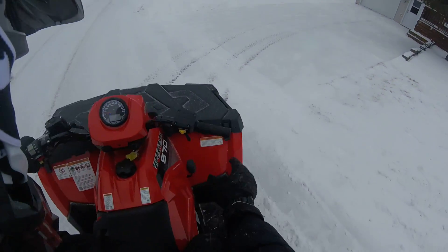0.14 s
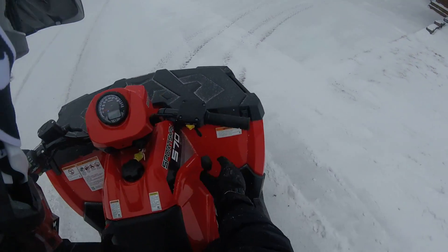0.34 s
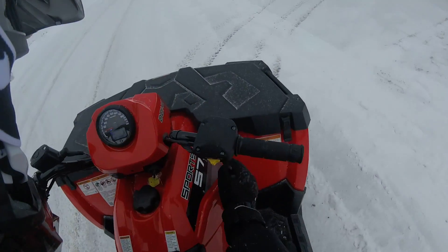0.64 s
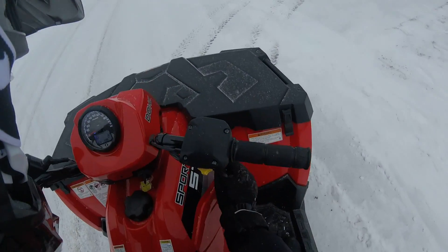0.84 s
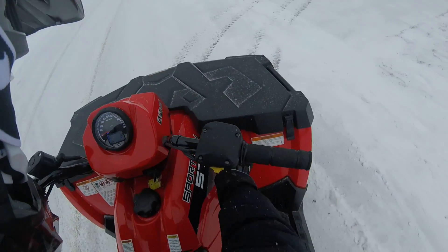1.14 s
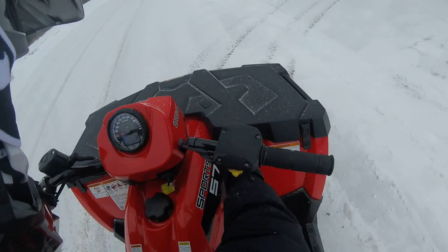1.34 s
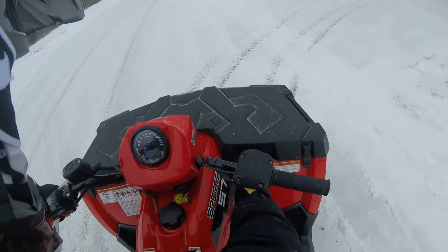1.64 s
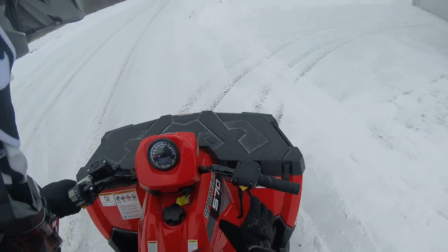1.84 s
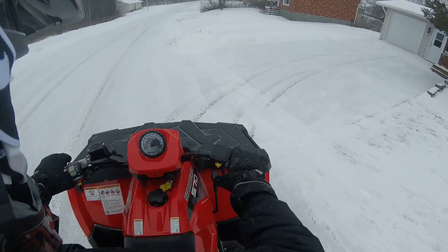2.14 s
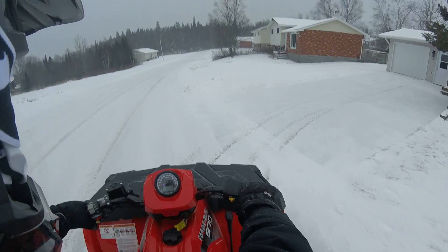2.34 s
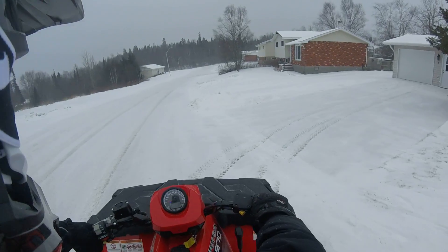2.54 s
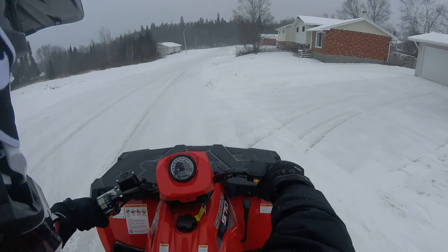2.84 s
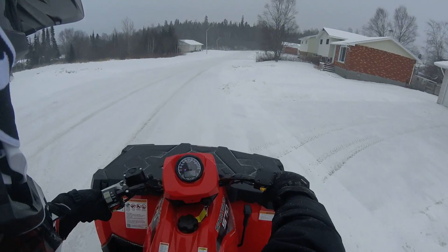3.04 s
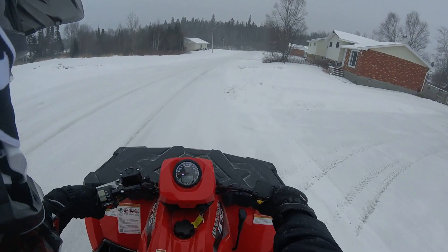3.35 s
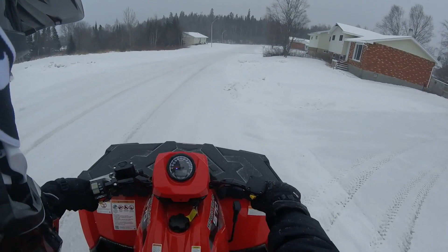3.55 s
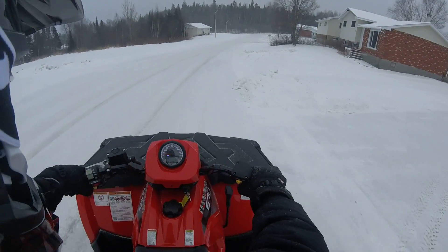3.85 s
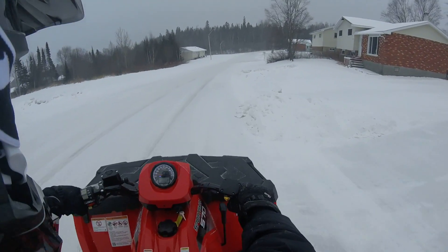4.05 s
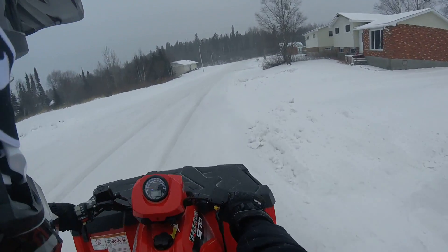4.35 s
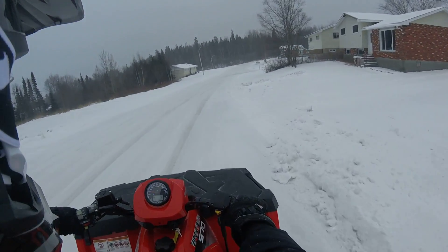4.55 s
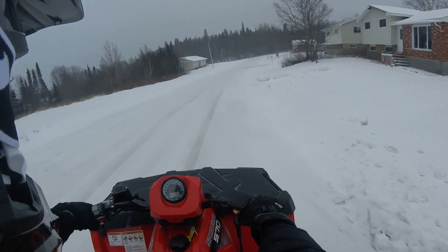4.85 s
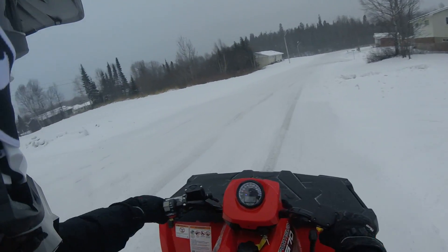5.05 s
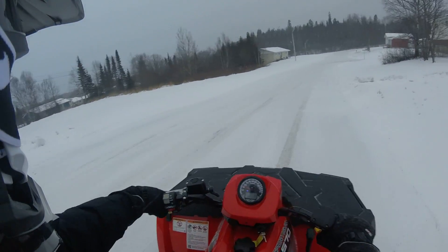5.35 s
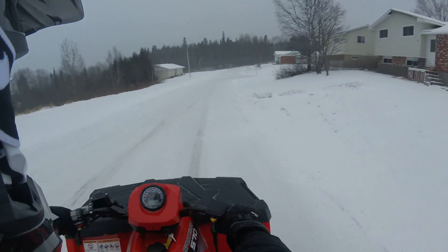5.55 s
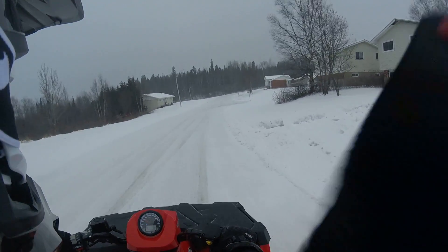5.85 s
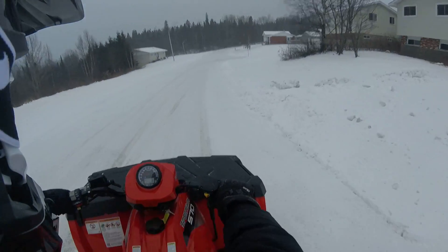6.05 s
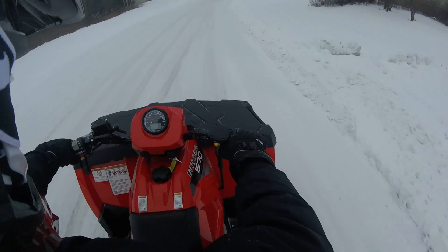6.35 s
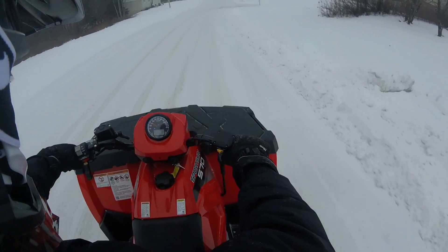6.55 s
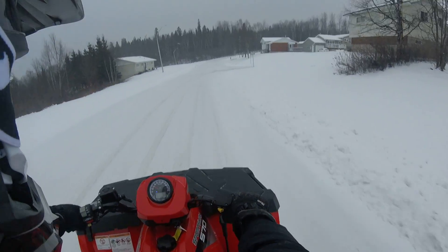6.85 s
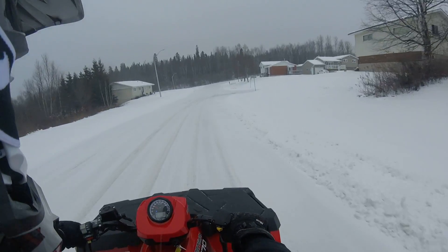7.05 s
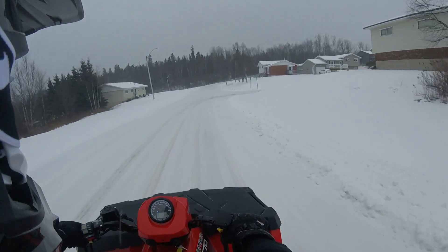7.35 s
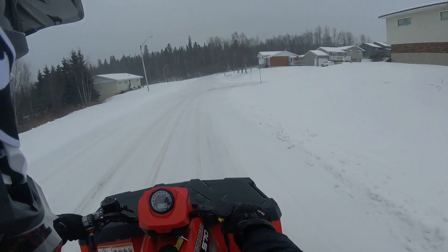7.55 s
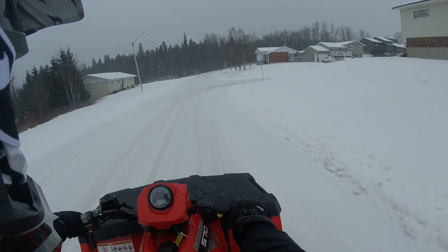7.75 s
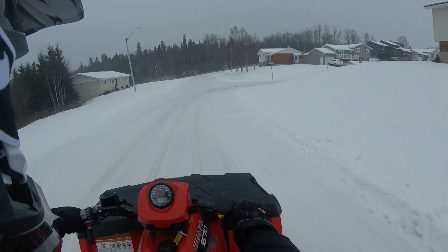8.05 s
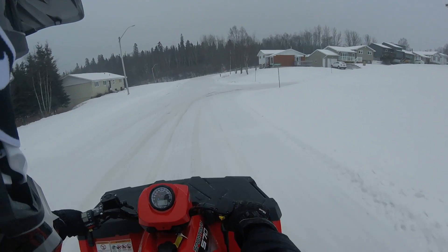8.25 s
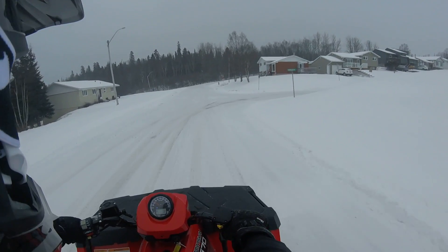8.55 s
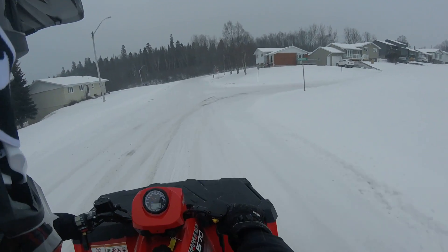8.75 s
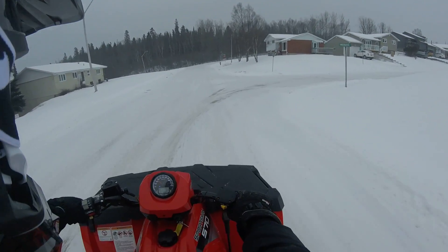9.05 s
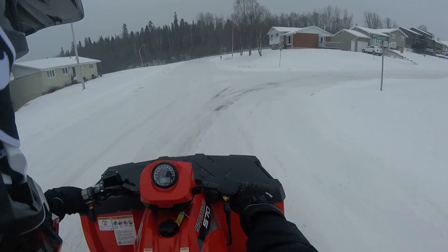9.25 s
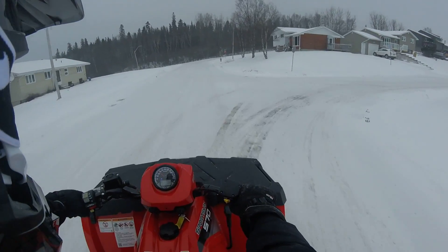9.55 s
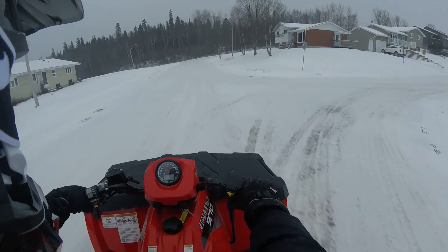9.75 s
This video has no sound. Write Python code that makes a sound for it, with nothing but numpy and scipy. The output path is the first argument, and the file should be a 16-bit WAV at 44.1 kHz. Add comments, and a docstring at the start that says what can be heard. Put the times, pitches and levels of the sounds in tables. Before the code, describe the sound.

A four-wheeler's single-cylinder engine putters at idle, clunks into gear, then revs up and drones along as wind buffets the microphone.

```python
"""A single-cylinder four-wheeler idles on a snowy road, clunks into gear and pulls away.
Idle firings thump in the muffler over a clatter of valve gear; under load they merge into a harmonic
drone with a roar that throbs each cycle, and the gears whine. It is heard from the rider's helmet,
through a microphone in a small housing that rings near 6 kHz; head wind buffets it as speed grows."""
import sys
import numpy as np
from scipy import signal
from scipy.fft import rfft, irfft, next_fast_len
from scipy.io import wavfile

SR = 44100
rng = np.random.default_rng(int(sys.argv[2]) if len(sys.argv) > 2 else 0)


def transcribe(signal):
    """Save signal, clipped to [-1, 1], as a 16-bit WAV file at the path in sys.argv[1]."""
    frames = np.atleast_2d(signal).T
    limited = np.clip(frames, -1, 1)
    pcm = np.round(limited * 32767).astype(np.int16)
    wavfile.write(sys.argv[1], SR, pcm)


N = 436590
TIME_S = np.arange(N) / SR

# idle firings where the pace changes: start_s, level_db
IDLE_BEATS = [(-0.004, -8), (0.063, -4.5), (0.449, -5), (1.15, -3.5), (1.342, -5.5), (1.448, -7.5),
              (1.938, -6.5), (2.521, -5.5), (2.59, -3)]
IDLE_PERIOD_S = 0.098

def idle_firings():
    """Times and levels of all idle firings: even beats fill the gaps between the listed ones."""
    start_s, level_db = np.transpose(IDLE_BEATS)
    count = np.r_[0, np.cumsum(np.round(np.diff(start_s) / IDLE_PERIOD_S))]
    firing_s = np.interp(np.arange(count[-1] + 1), count, start_s)
    return firing_s, np.interp(firing_s, start_s, level_db)


# low thump of the muffler: pitch_hz, level_db, t60_s
MUFFLER_MODES = [(86, 3, 0.053), (111.8, 1, 0.18), (56.5, -24, 0.058)]
# hollow ring of the tailpipe: pitch_hz, level_db, t60_s
TAILPIPE_MODES = [(213, -26.5, 0.085), (263, -22, 0.059), (335, -31, 0.049), (440, -31, .04),
                  (540, -32, .03)]
PUFF_LEAD_S, SURGE_GAP_S = 0.0047, 0.0115

def idle_putts():
    """A puff of gas, first a dip in pressure, rings the muffler; three surges ring the tailpipe."""
    start_s, level_db = idle_firings()
    thump = struck(start_s - PUFF_LEAD_S, level_db, MUFFLER_MODES, spread_db=1)
    surges = sum(struck(start_s + k * SURGE_GAP_S, level_db, TAILPIPE_MODES, spread_db=4)
                 for k in range(3))
    return soften(surges, puff_ms=4.08) - soften(thump, puff_ms=9.44)


# engine revs under load: time_s, firing_hz
REVS = [(2.63, 23.5), (2.69, 26.2), (2.73, 27.4), (2.81, 29.3), (2.85, 29.9), (3.01, 31.6), (3.12, 33.2),
        (3.32, 38.5), (3.4, 40.7), (3.54, 44.2), (3.68, 45.9), (3.76, 45.6), (4.07, 43.2), (4.63, 42.8),
        (4.8, 42.4), (5.02, 42.5), (5.26, 42.9), (5.87, 43.1), (6.03, 43.7), (7.79, 44.5), (9.11, 44.5),
        (9.17, 45.2), (9.33, 48.6), (9.43, 50.3), (9.59, 51.3), (9.7, 51.7), (9.9, 48.5)]
# faders of the pulling engine: time_s, drone_db, roar_db
LOAD_LEVELS = [(2.6, -24.5, -35), (2.72, -18.5, -28), (2.97, -16.5, -24), (3.29, -18, -25.5),
               (3.45, -15.5, -24.5), (3.8, -17.5, -23.5), (4.17, -15, -25), (4.8, -15.5, -25.5),
               (5.33, -17.5, -23), (5.85, -15.5, -26), (7.3, -22, -31), (8.2, -20, -26.5),
               (8.5, -17.5, -27), (8.93, -29, -26.5), (9.03, -22.5, -26), (9.58, -18.5, -21.5),
               (9.9, -30, -24)]

def engine_under_load():
    """Fast firings make a drone; rushing gas roars and sets panels singing; the gears whine along."""
    firing_hz, = automation(REVS)
    drone_db, roar_db = automation(LOAD_LEVELS)
    running = gate(REVS[0][0], fade_s=0.035)
    cycles = np.cumsum(firing_hz * (running == 1)) / SR
    gas = rng.standard_normal(N) * from_db(0.72 * drift(9.5))
    roar_mix = gas_roar(gas, cycles) + singing_panels(gas) + gear_whine(cycles)
    drone = exhaust_drone(firing_hz, cycles)
    return running * (from_db(drone_db) * drone + from_db(roar_db) * roar_mix)


# tone of the exhaust: pitch_hz, gain_db
EXHAUST_EQ = [(20, -2), (43, 3.5), (87, 2), (130, 2.5), (148, -0.5), (170, -1), (215, -13.5), (243, -1),
              (262, -4), (278, -7.5), (300, -6.5), (345, -17.5), (388, -11), (430, -7.5), (472, -14.5),
              (515, -8.5), (560, -4.5), (600, -14), (645, -21), (690, -19), (735, -16), (775, -40),
              (840, -26), (920, -29.5), (1100, -29), (1200, -26.5), (1400, -54)]
# the pipes smear each firing, each harmonic trailing the one below: pitch_hz, lag_cycles
PIPE_LAG = [(28, .7), (43, .9), (55, .55), (100, .5), (135, .7), (150, .7), (180, .45), (205, 1.05),
            (260, 1.2), (440, 1.25), (510, 1.72), (900, 1.74), (1100, 1.9)]
# crank and balancer shake: harmonic, boost_db
CRANK_SHAKE = [(1, 3.5), (2, 2), (3, 1.5), (4, 10.5), (5, 3), (6, 3.5), (7, 1.5), (8, -2)]
# the frame's answer to the fourth harmonic: pitch_hz, gain_db
FRAME_SHAKE = [(94, 0), (110, -2.5), (133, -2.5), (148, -6), (163, -2), (175, -4), (184, 2.5), (205, 3)]
FRAME_LAG_CYCLES = 0.2  # the frame is a shorter path than the pipes
BARK_S, BARK_DECAY_S, REOPENED_S = 2.82, 0.32, (9.2, 9.55)

def exhaust_drone(firing_hz, cycles):
    """Harmonics of the firing rate, shaped by the pipes; the opening throttle barks and growls."""
    step = 8  # built at an eighth of the sample rate
    bark = settle(BARK_S, BARK_DECAY_S) * gate(BARK_S, fade_s=0.29)
    intake_db = (5.5 * bark - 0.1)[::step]
    growl_db = 5 * np.maximum(0.5 * bark, gate(*REOPENED_S, fade_s=0.12))[::step]
    firing_hz, cycles = firing_hz[::step], cycles[::step]
    eq_hz, eq_db = np.transpose(EXHAUST_EQ)
    drone, lag = 0, 0
    for k in range(1, 46):
        hz = k * firing_hz
        lag += FRAME_LAG_CYCLES if k == 4 else lookup(hz, PIPE_LAG)
        level_db = np.interp(np.log(hz), np.log(eq_hz), eq_db, right=-80)
        level_db += lookup(k, CRANK_SHAKE, right=0)
        if k % 4 == 0:  # higher multiples of the fourth stand out too
            level_db += lookup(hz, FRAME_SHAKE) if k == 4 else 4.5
        level_db += intake_db * ((hz > 400) + 1.54 * (hz > 950))  # the upper intake ring barks harder
        level_db += growl_db * (hz > 225) * (hz < 335)
        level_db += 1.2 * drift(6, step)
        level_db += 1.2 * drift(25, step) * (hz > 400)  # upper harmonics are more ragged
        wobble = (0.07 + 0.012 * k) * drift(7, step)
        drone += from_db(level_db) * np.sin(2 * np.pi * (k * cycles - lag) + wobble)
    return unit_rms(signal.resample_poly(drone, step, 1, padtype="antireflect")[:N])


# tone of the rushing gas: frequency_hz, gain_db
ROAR_EQ = [(25, -22), (60, -6.5), (105, -4.5), (150, -10), (240, -8), (350, -13.5), (550, -16.5),
           (800, -22), (1200, -25.5), (1700, -25), (2800, -28.5), (4500, -35.5), (7000, -39), (12000, -40)]
THROB_LAG_CYCLES, RASP_ABOVE_HZ = 0.898, 2270

def gas_roar(gas, cycles):
    """Gas noise bursts into a bright rasp once a cycle; hard early beats melt into the roar."""
    throb = (0.5 + 0.5 * np.cos(2 * np.pi * (cycles - THROB_LAG_CYCLES))) ** 4.5
    burst_db = 2.5 + 7.5 * settle(2.99, decay_s=0.22)
    rasp = highpass(gas * (from_db(burst_db * throb) - 1), RASP_ABOVE_HZ)
    return unit_rms(colour(gas + rasp, ROAR_EQ))


# resonances of the panels: pitch_hz, width_hz, level_db
PANEL_MODES = [(2510, 90, -33), (2763, 37, -33.5), (3040, 110, -35)]

def singing_panels(gas):
    """Gas noise excites narrow resonances, loudest at the top of the first rev."""
    singing = 0
    for hz, width_hz, db in PANEL_MODES:
        ring = signal.lfilter(*signal.iirpeak(hz, hz / width_hz, SR), gas)
        singing += from_db(db) * unit_rms(ring)
    return singing * from_db(10.5 * gate(3.53, 3.95, fade_s=0.35))


# gear and valve tones: firing_multiple, level_db
WHINE_PARTIALS = [(25, .5), (38, 1), (46.5, -3)]

def gear_whine(cycles):
    """Gears and valves sing wavering tones that follow the revs, fainter later in the ride."""
    whine = 0
    for multiple, db in WHINE_PARTIALS:
        level = from_db(db + 3 * drift(14))
        whine += level * np.sin(2 * np.pi * multiple * cycles + 1.1 * drift(13))
    return whine * from_db(-19.5 - 6 * gate(6.6, fade_s=0.66))


# tone of the valve gear and belt: frequency_hz, gain_db
CLATTER_EQ = [(25, -42), (60, -2), (110, 1), (170, -7.5), (300, -10.5), (500, -16), (800, -21.5),
              (1080, -21.5), (1400, -25), (2000, -28), (4000, -34.5), (8000, -38.5), (12000, -32)]
QUIETER_S, THROTTLE_S, IDLE_WHINE_HZ = 1.41, 2.567, 726
SWELL_DB, SWELL_WIDTH_S, SWELL_LAG_S = 2.5, 0.025, 0.01

def idle_clatter():
    """Valve gear and belt rustle, swelling with each firing; a thin whine comes and goes."""
    firing_s, _ = idle_firings()
    stroke = np.interp(TIME_S - SWELL_LAG_S, firing_s, np.arange(len(firing_s)))
    off_beat_s = (stroke - np.round(stroke)) * IDLE_PERIOD_S
    swell = np.exp(-(off_beat_s / SWELL_WIDTH_S) ** 2) * (TIME_S < firing_s[-1])
    # quieter from 1.4 s on, louder as the throttle opens
    level_db = -37.5 - 3 * gate(QUIETER_S, fade_s=0.12) + 9 * gate(THROTTLE_S, fade_s=0.088)
    rustle = rng.standard_normal(N) * from_db(1.2 * drift(20))
    clatter = unit_rms(colour(rustle, CLATTER_EQ)) * from_db(level_db + SWELL_DB * swell)
    whine_db = -51.5 - 25 * np.abs(TIME_S - np.clip(TIME_S, 0.55, 1.75))  # fades in, holds, fades out
    whine = from_db(whine_db) * np.sin(phase(IDLE_WHINE_HZ + 0.8 * drift(3.3)))
    return (clatter + whine) * gate(0, 2.525, fade_s=0.22)


def drivetrain_whine():
    """A thin, wavering tone from the drivetrain climbs as the ride gathers speed, then levels off."""
    pitch_hz = np.minimum(607 + 67 * (TIME_S - 6.3), 725)
    level = from_db(-36.5 + drift(3)) * gate(6.7, 8.0, fade_s=0.57)
    return level * np.sin(phase(pitch_hz) + 0.24 * drift(18))


# gear lever and glove hits: start_s, level_db, thud_offset_db
KNOCK_HITS = [(0.03, -35, 9), (0.101, -27, 3), (0.17, -42, 12), (0.26, -46, 12), (0.604, -27, 2),
              (1.009, -21.5, -4), (1.015, -19.5, 7.5), (1.03, -8.5, -6.5), (1.132, -25.5, 7.5),
              (1.338, -27, -4), (1.376, -11.5, -15), (1.384, -4.5, -6.5), (1.409, -26, 5),
              (2.081, -25.5, -4), (2.608, -17.5, -1.5)]
# tone of the crunch: frequency_hz, gain_db
CRUNCH_EQ = [(100, -40), (300, -2), (435, -4.5), (500, -0.5), (560, 1), (640, -21), (725, 0), (860, -11.5),
             (1030, -11.5), (1500, -18.5), (3000, -18), (6000, -25.5), (12000, -36)]
# tone of the thud: frequency_hz, gain_db
THUD_EQ = [(60, -20), (150, -1), (300, -2), (550, -9), (1000, -18.5), (3000, -42)]

def lever_and_glove_knocks():
    """Each knock is a short crunch of uneven clicks over a low thud that lasts longer."""
    crunch, thud = np.zeros(N), np.zeros(N)
    for start_s, db, thud_offset_db in KNOCK_HITS:
        crunch += hit_envelope(start_s, db, rise_s=0.0059, t60_s=0.042)
        thud += hit_envelope(start_s, db + thud_offset_db, rise_s=0.01, t60_s=0.13)
    clicks = rng.standard_normal(N) * from_db(0.91 * drift(280))
    return crunch * unit_rms(colour(clicks, CRUNCH_EQ)) + thud * unit_rms(colour(clicks, THUD_EQ))


# fader of the head wind: time_s, level_db
WIND_LEVELS = [(3.0, -52), (5.9, -25.5), (6.3, -25.5), (6.8, -29.5), (7.0, -23.5), (7.12, -19.5),
               (7.35, -22.5), (7.5, -25), (7.72, -21), (7.95, -21.5), (8.12, -20), (8.22, -16.5),
               (8.33, -19.5), (8.45, -16.5), (8.6, -19), (8.8, -17), (8.97, -20), (9.1, -20.5), (9.28, -18),
               (9.55, -17.5), (9.9, -19)]
# single slaps of wind: start_s, level_db
WIND_SLAPS = [(7.117, -20), (7.699, -7), (8.319, -2), (8.419, -11), (8.499, -13), (8.611, 2), (8.719, -11),
              (9.029, -5), (9.759, -11.5)]
# low rumble of the buffeting: frequency_hz, gain_db
BUFFET_EQ = [(20, 6.5), (50, 5.5), (150, 1), (350, -3), (700, -9), (1400, -27), (3000, -51)]
# hiss on top of the gusts: frequency_hz, gain_db
GUST_EQ = [(200, -26.5), (500, -5.5), (900, -5.5), (1500, -19), (3000, -47.5)]
SLAP_TRIM_DB, FULL_GUST_DB = -9.5, -13.5

def head_wind():
    """Air buffets the microphone with lumpy low noise and single slaps; strong gusts are brighter."""
    lumps = rng.standard_normal(N) * from_db(0.6 * drift(8) + 2.5 * drift(35))
    level_db, = automation(WIND_LEVELS)
    level = from_db(level_db) * gate(WIND_LEVELS[0][0], fade_s=0.27)
    for start_s, db in WIND_SLAPS:
        level += hit_envelope(start_s, db + SLAP_TRIM_DB, rise_s=0.006, t60_s=0.054)
    rumble = unit_rms(colour(lumps, BUFFET_EQ))
    hiss = unit_rms(colour(lumps, GUST_EQ)) * from_db(-12.5 + 0.77 * (level_db - FULL_GUST_DB))
    return level * (rumble + hiss)


# ticks on the housing: start_s, level_db, body_offset_db, ring_offset_db
TICK_HITS = [(0.105, -32, -5, -16), (0.53, -43, 5, -12), (0.785, -43, -8, -12), (1.3497, -39, -4, -12),
             (2.0825, -42, -4, -4), (2.2167, -40, -3, -10), (2.55, -36, -3, -12), (5.9274, -48, 0, -12),
             (5.9459, -29, -5, -12), (5.9588, -13, -3.5, 0), (6.487, -39, 8, -15.5),
             (6.5252, -15, -3.5, -13), (7.683, -36, -4, -12), (8.151, -25, -2, -12)]
# bright snap of the shell: pitch_hz, level_db, t60_s
SNAP_MODES = [(6460, -0.5, 0.0037), (8160, -5, 0.0024), (11000, 5, 0.0013), (13500, -6, 0.0015)]
# its lower body: pitch_hz, level_db, t60_s
BODY_MODES = [(850, 0.5, 0.0068), (1300, 1.5, 0.0051), (2240, 5.5, 0.004), (3960, 4, 0.0043)]
# its longer ring: pitch_hz, level_db, t60_s
RING_MODES = [(1340, -15.5, 0.067)]

def housing_ticks():
    """Small hits ring the shell of the microphone housing."""
    start_s, level_db, body_offset_db, ring_offset_db = np.transpose(TICK_HITS)
    snap = struck(start_s, level_db, SNAP_MODES, spread_db=1.5)
    body = struck(start_s, level_db + body_offset_db, BODY_MODES, spread_db=1.5)
    ring = struck(start_s, level_db + ring_offset_db, RING_MODES, spread_db=1)
    return snap + body - ring


# dips in the riding sound: start_s, depth_db, recovery_s
LEVEL_DIPS = [(5.92, 11.5, 0.55), (6.465, 4.5, 0.2), (8.6, 3, 0.12)]
DIP_ATTACK_S = 0.007

def level_dips():
    """A gain that drops suddenly at each dip and creeps back."""
    gain_db = 0
    for start_s, depth_db, recovery_s in LEVEL_DIPS:
        attack = np.minimum(since(start_s) / DIP_ATTACK_S, 1)
        gain_db -= depth_db * attack * settle(start_s, recovery_s)
    return from_db(gain_db)


def from_db(db):
    return 10 ** (np.asarray(db) / 20)


def unit_rms(x):
    return x / np.sqrt(np.mean(x ** 2) + 1e-20)


def phase(hz):
    return 2 * np.pi * np.cumsum(hz) / SR


def highpass(x, hz):
    return signal.sosfilt(signal.butter(2, hz, "high", fs=SR, output="sos"), x)


def lookup(x, table, right=None):
    return np.interp(x, *np.transpose(table), right=right)


def since(start_s):
    return np.maximum(TIME_S - start_s, 0)


def settle(start_s, decay_s):
    """Holds at 1 until the start, then decays."""
    return np.exp(-since(start_s) / decay_s)


def hit_envelope(start_s, db, rise_s, t60_s):
    """A quick rise and an exponential tail."""
    age_s = since(start_s)
    return from_db(db - 60 * age_s / t60_s) * (1 - np.exp(-age_s / rise_s))


def automation(rows):
    """One curve for each column after the time."""
    time_s, *columns = np.transpose(rows)
    return [np.interp(TIME_S, time_s, column) for column in columns]


def gate(start_s, stop_s=N / SR, *, fade_s):
    """1 between two times, with linear fades outside them."""
    return np.interp(TIME_S, [start_s - fade_s, start_s, stop_s, stop_s + fade_s], [0, 1, 1, 0])


def drift(rate_hz, step=1):
    """Smooth random wander of spread 1, read at every step-th sample."""
    hop, warm_up = 40, 2000
    pole = np.exp(-2 * np.pi * hop * rate_hz / SR)
    noise = rng.standard_normal(N // hop + warm_up + 2)
    slow = signal.lfilter([1], [1, -2 * pole, pole * pole], noise)[warm_up:]
    return np.interp(np.arange(0, N, step) / hop, np.arange(len(slow)), unit_rms(slow))


def colour(x, eq):
    """Causal (minimum-phase) filter that follows an EQ table."""
    size, taps = next_fast_len(N + SR), 16384
    hz, db = np.transpose(eq)
    gain_db = np.interp(np.log(np.fft.rfftfreq(taps, 1 / SR) + 1), np.log(hz), db)
    cepstrum = irfft(gain_db * np.log(10) / 20)
    cepstrum[1:taps // 2] *= 2
    response = irfft(np.exp(rfft(cepstrum[:taps // 2 + 1], taps)))
    return irfft(rfft(x, size) * rfft(response, size), size)[:N]


def struck(start_s, level_db, modes, spread_db):
    """Every hit rings every mode at a slightly random level, neighbouring modes in opposite sign."""
    scatter_db = spread_db * rng.standard_normal((len(start_s), len(modes)))
    onsets = np.round((start_s + 1) * SR).astype(int)  # a second of pre-roll for early hits
    ringing = np.zeros(N)
    for k, (hz, mode_db, t60_s) in enumerate(modes):
        clicks = np.full(N + SR, 1e-18)
        clicks[onsets] = from_db(level_db + mode_db + scatter_db[:, k])
        radius, angle = from_db(-60 / (t60_s * SR)), 2 * np.pi * hz / SR
        feedback = [1, -2 * radius * np.cos(angle), radius ** 2]
        ringing += (-1) ** k * signal.lfilter([0, np.sin(angle)], feedback, clicks)[SR:]
    return ringing


def soften(x, puff_ms):
    """A soft push instead of a click."""
    puff = np.hanning(round(puff_ms * SR / 1000))
    return np.convolve(x, puff / puff.sum())[:N]


def scene():
    """The idle gives way to the ride, with knocks and ticks on top, in mono."""
    ticks = housing_ticks()
    riding = level_dips() * (engine_under_load() + drivetrain_whine() + head_wind())
    return (idle_putts() + idle_clatter() + riding + lever_and_glove_knocks() - ticks)[None]


# tone of the microphone housing: frequency_hz, gain_db
HOUSING_EQ = [(2500, 0), (3200, -2), (4200, -6), (4700, -0.5), (5500, 10), (6100, 6.5), (6520, 12.5),
              (7000, 2.5), (9000, -4.5), (10500, -12.5), (11500, -25), (12300, -37), (16000, -51)]
BASS_CUT_HZ, TOP_CUT_HZ, PEAK_LIMIT = 37, 16500, 0.75

def record(dry):
    """The housing colours the treble; the deepest bass is cut, peaks are rounded, the top is cut."""
    housed = highpass(colour(dry[0], HOUSING_EQ), BASS_CUT_HZ)
    rounded = housed / (1 + (housed / PEAK_LIMIT) ** 4) ** 0.25
    return signal.sosfilt(signal.cheby2(12, 70, TOP_CUT_HZ, fs=SR, output="sos"), rounded)[None]


dry = scene()
out = record(dry)
transcribe(out)
```